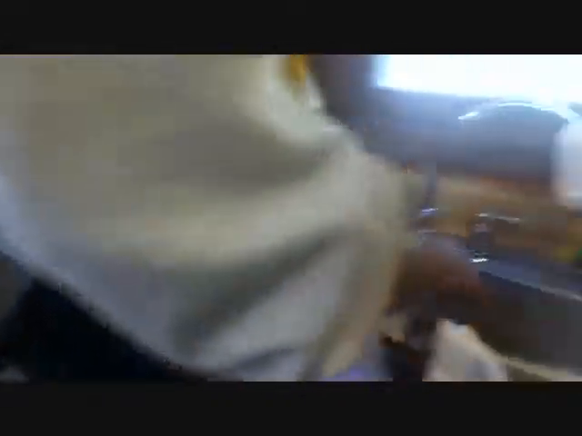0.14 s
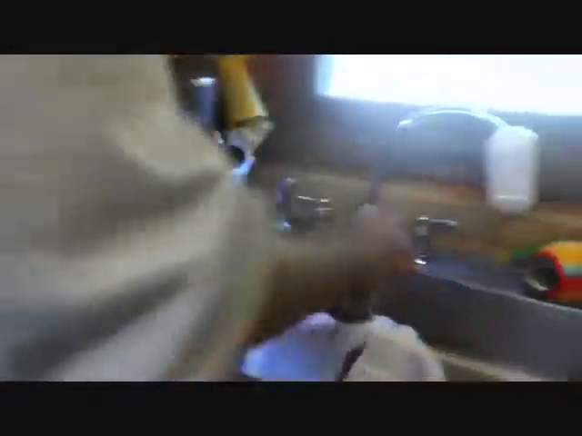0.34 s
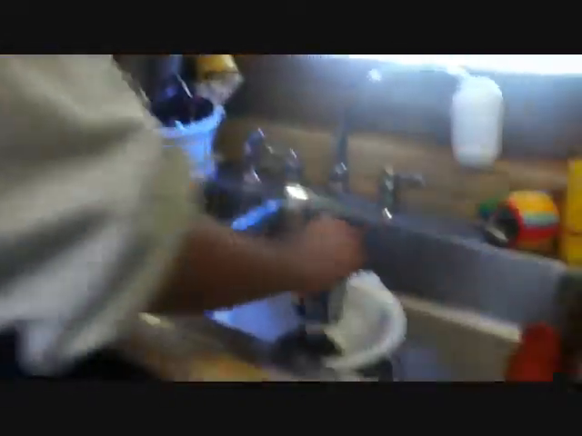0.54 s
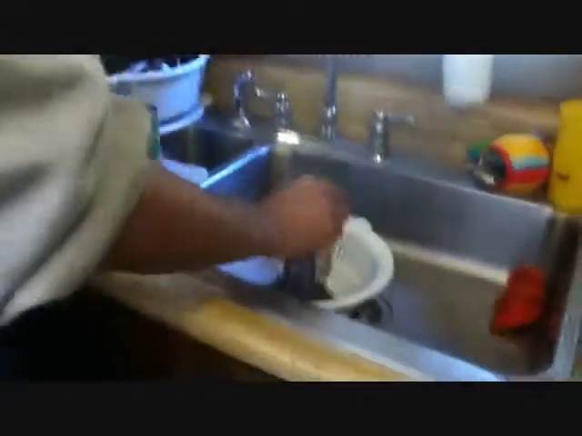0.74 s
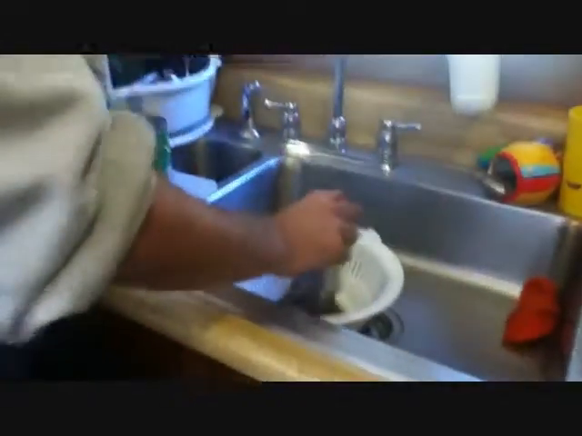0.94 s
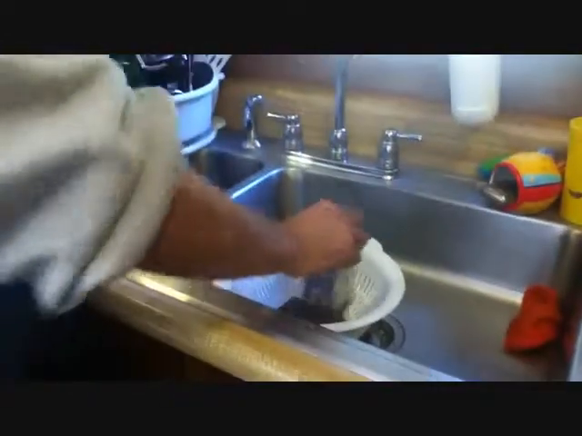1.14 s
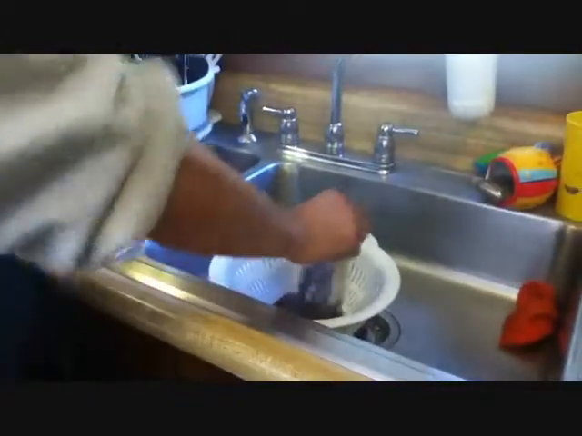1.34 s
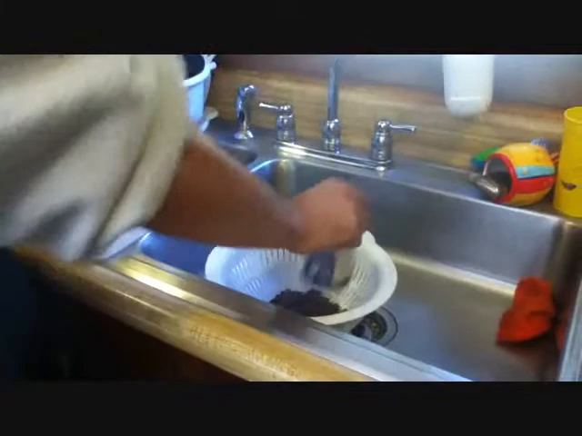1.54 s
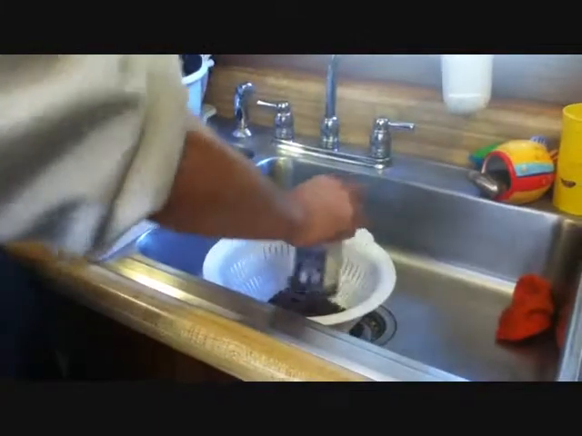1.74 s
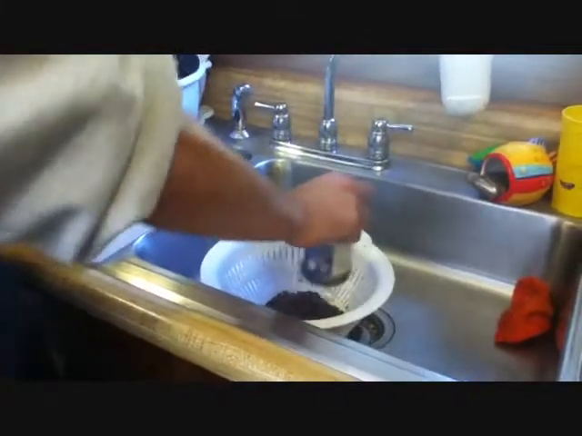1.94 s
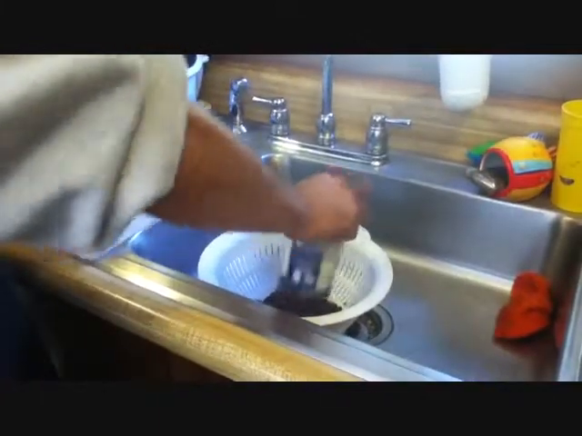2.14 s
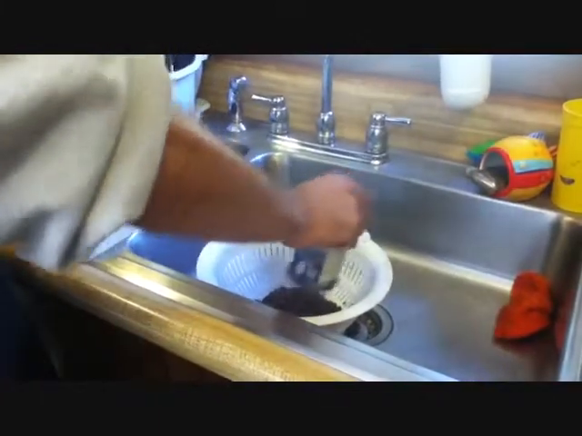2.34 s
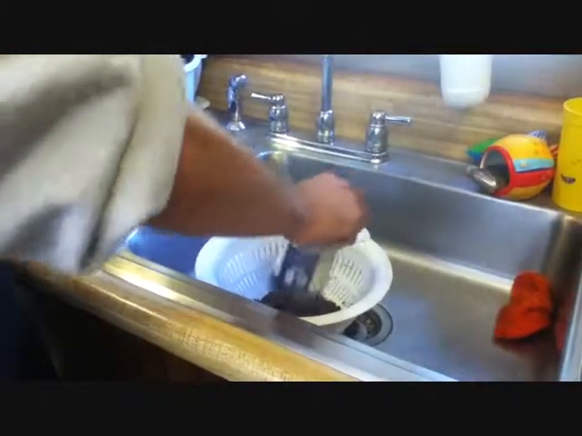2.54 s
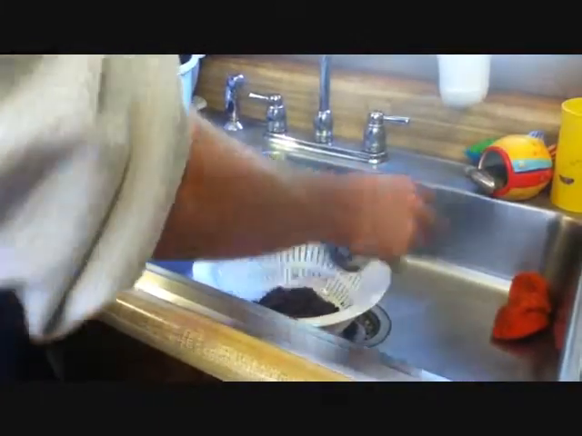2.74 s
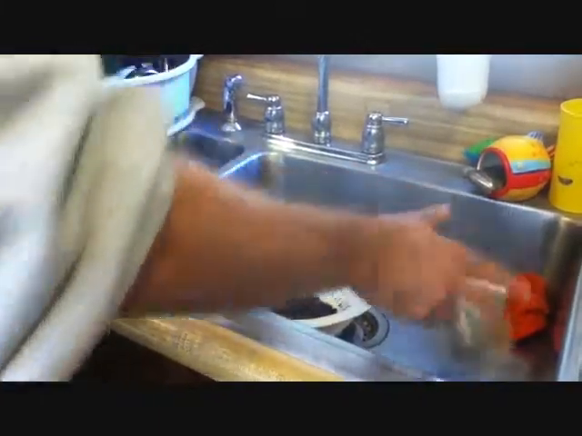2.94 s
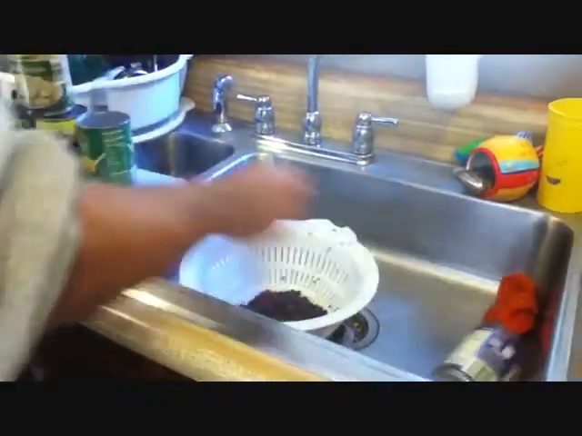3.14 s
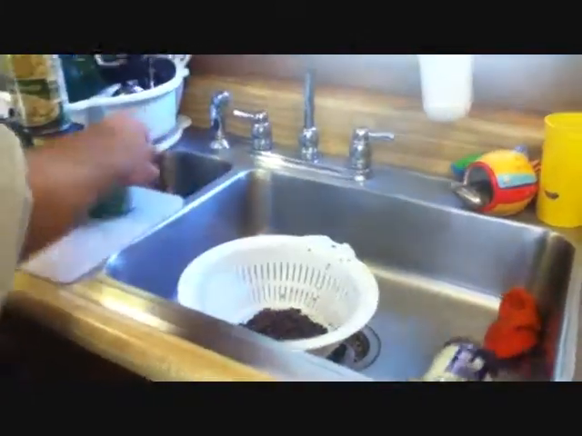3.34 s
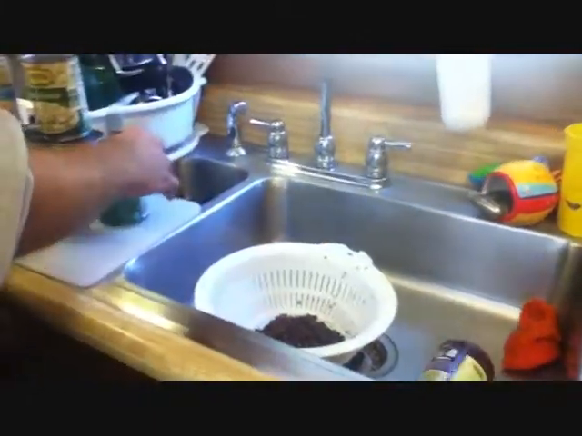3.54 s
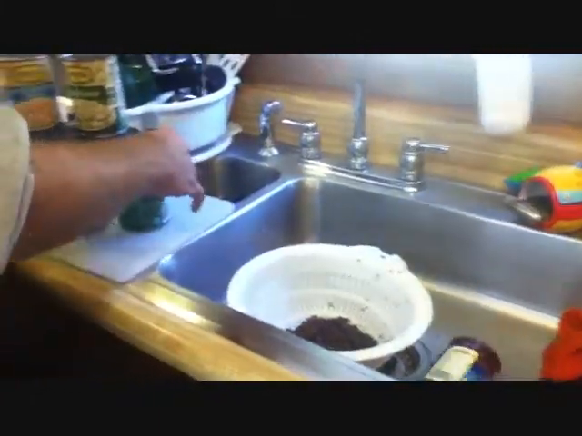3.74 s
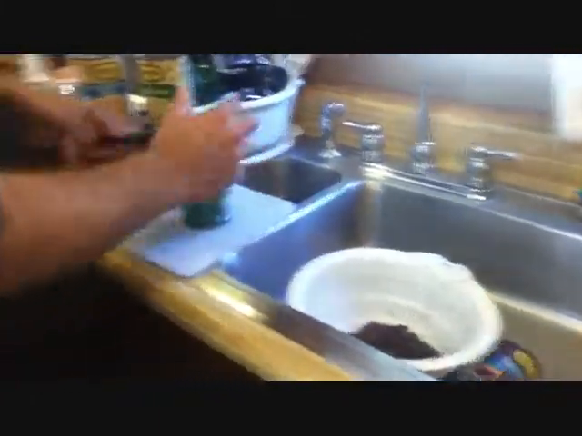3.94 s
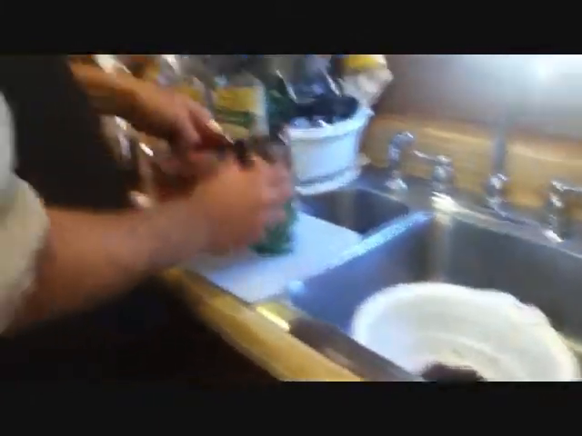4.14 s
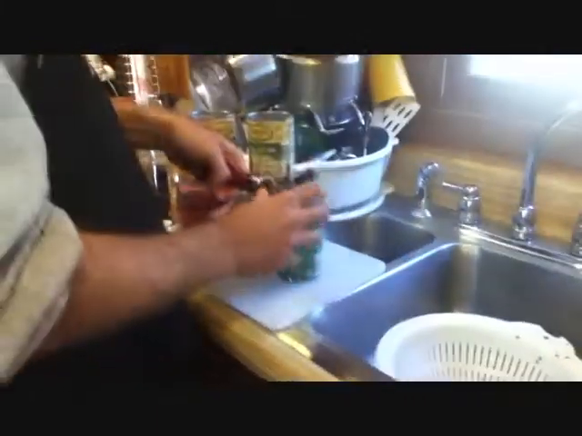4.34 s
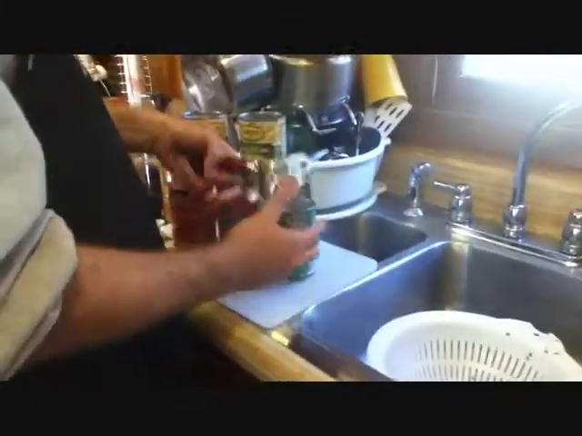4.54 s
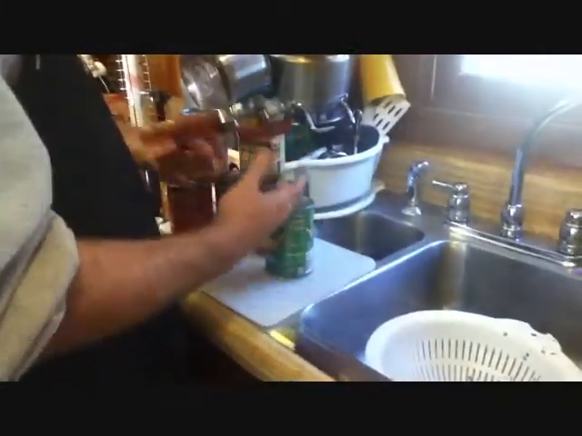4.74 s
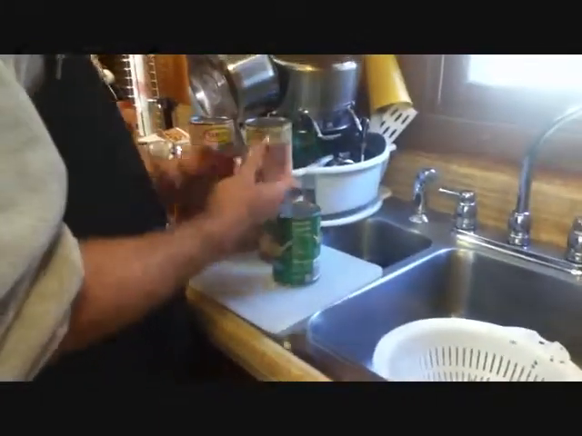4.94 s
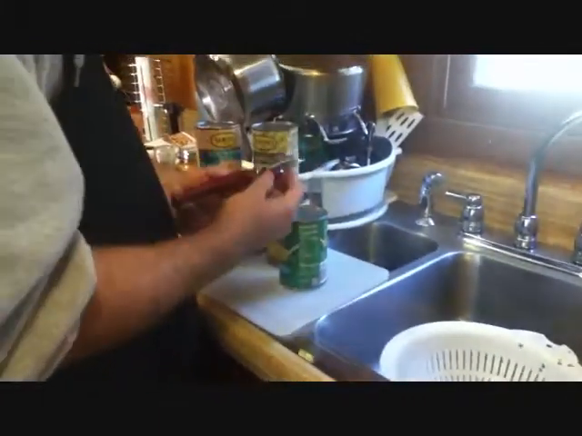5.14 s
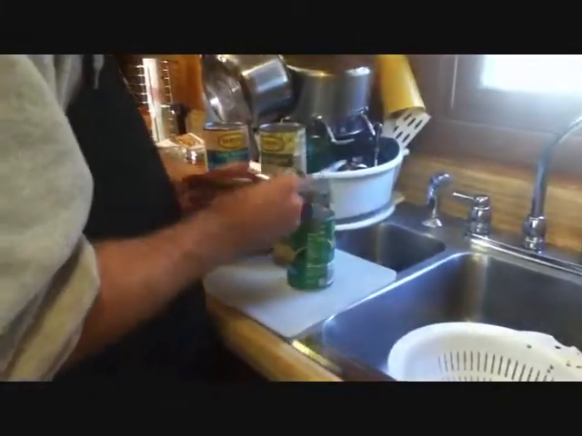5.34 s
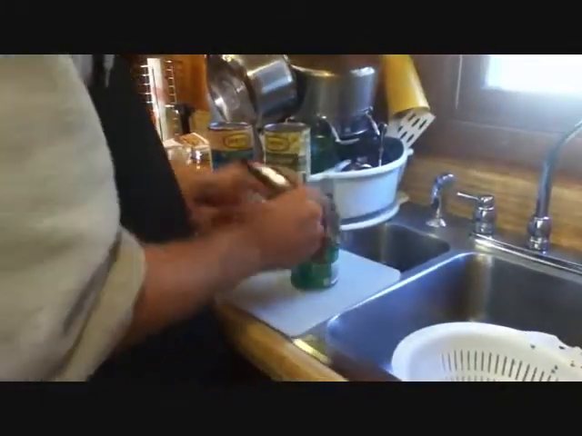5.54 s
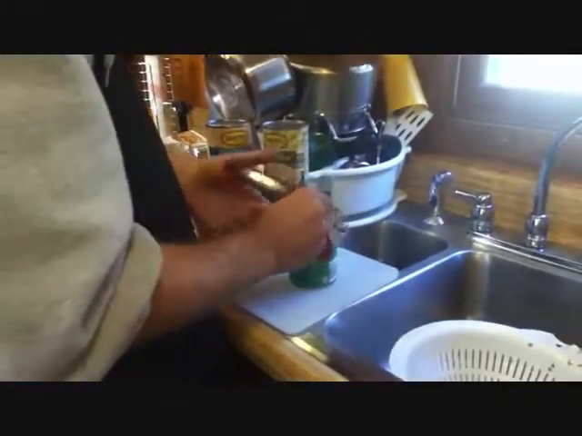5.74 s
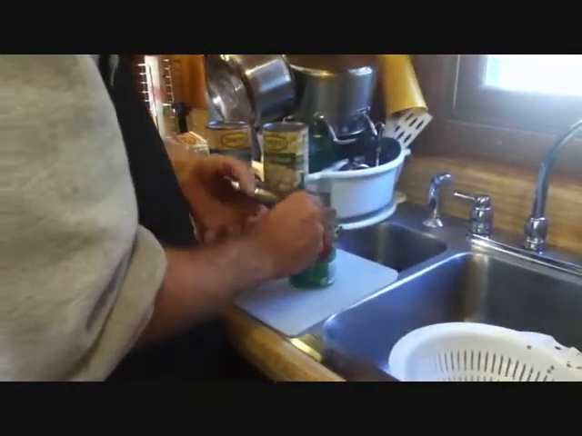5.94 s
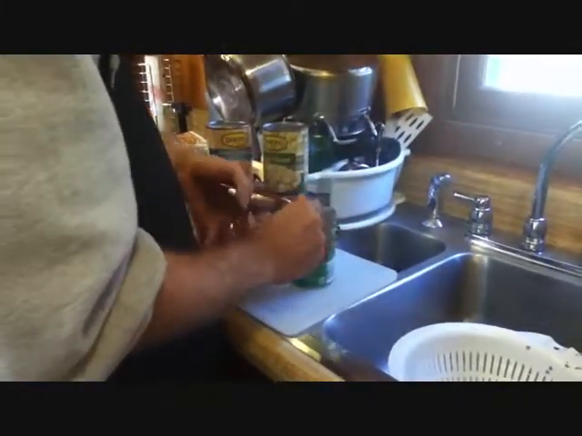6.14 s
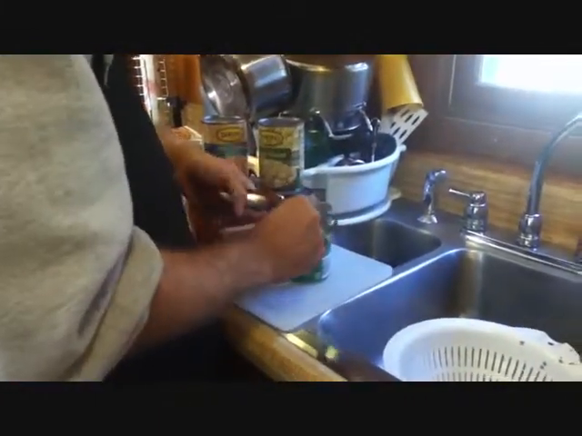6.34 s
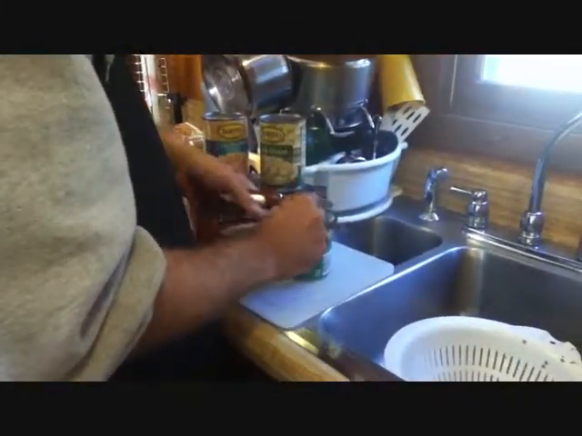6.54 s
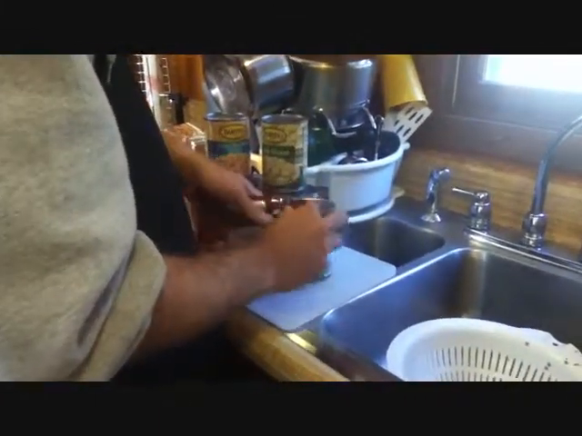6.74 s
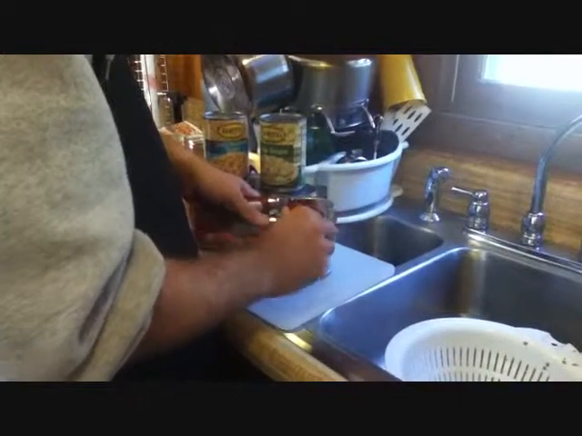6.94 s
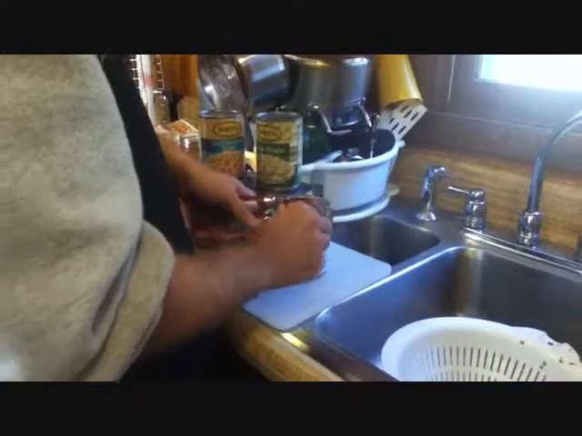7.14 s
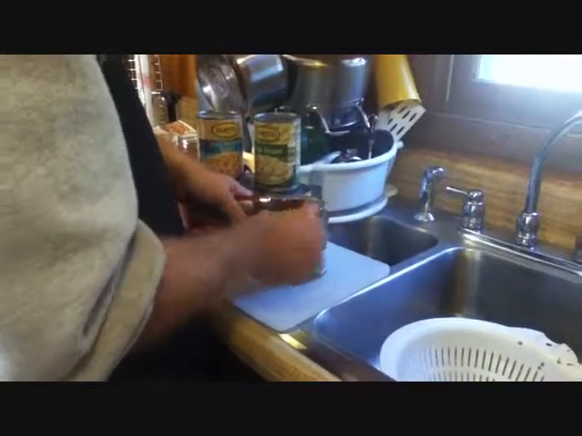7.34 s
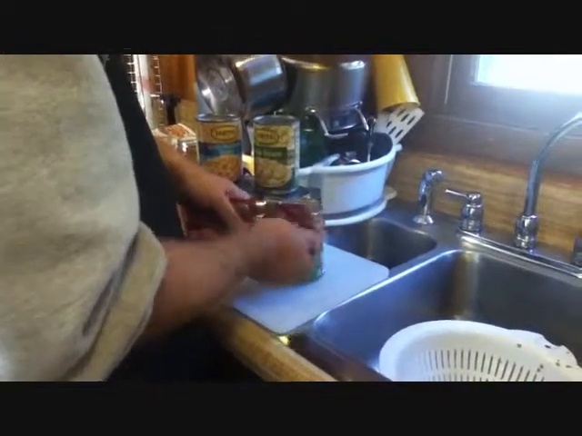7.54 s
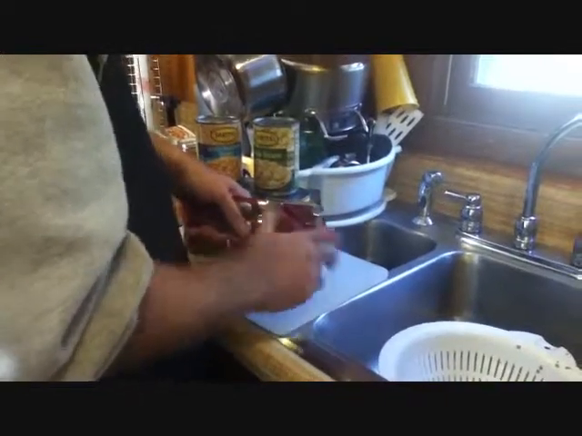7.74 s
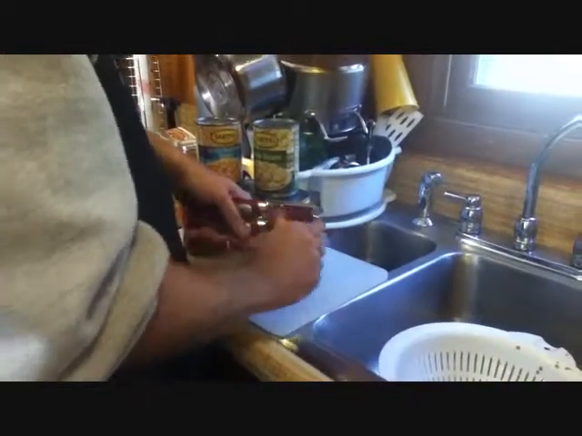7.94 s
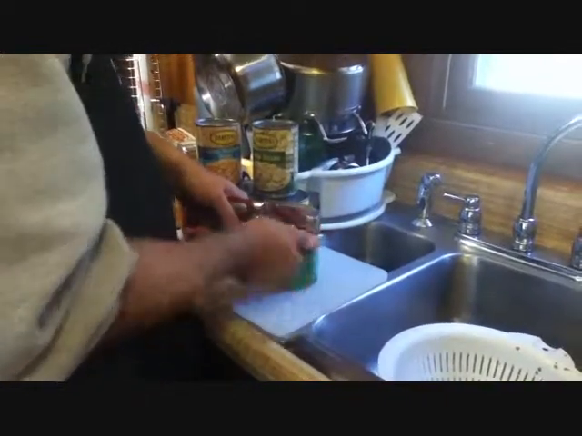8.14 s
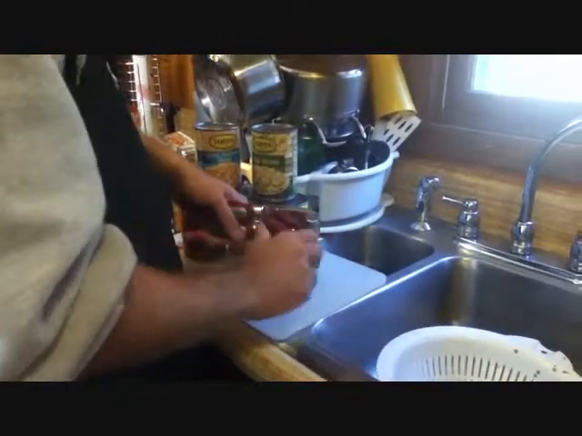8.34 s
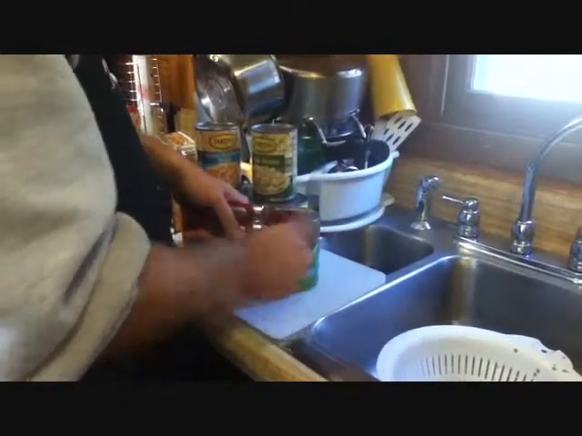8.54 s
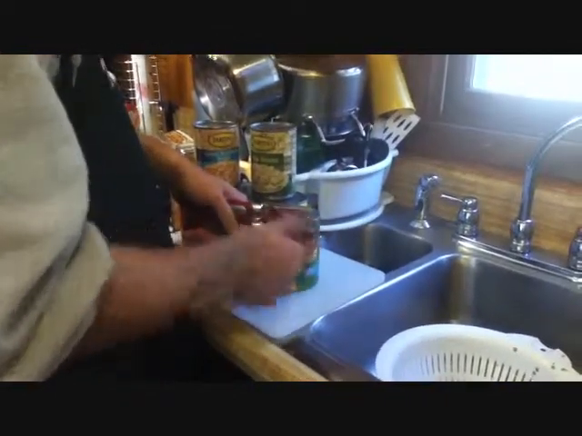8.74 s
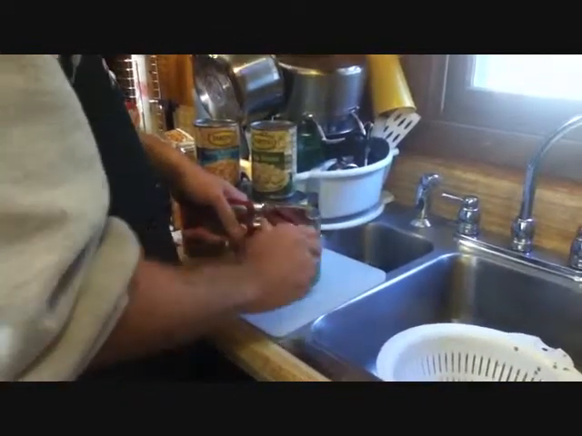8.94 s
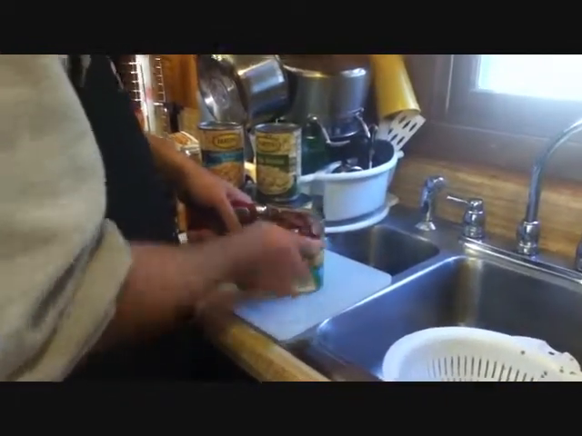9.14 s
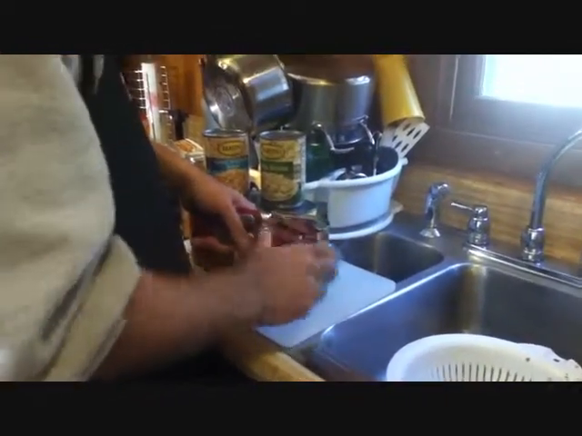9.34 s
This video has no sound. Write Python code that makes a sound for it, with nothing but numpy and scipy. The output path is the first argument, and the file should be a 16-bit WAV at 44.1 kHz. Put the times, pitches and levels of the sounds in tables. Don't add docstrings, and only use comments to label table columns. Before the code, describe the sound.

A small close microphone in a kitchen with short echo and faint, noise-suppressed hiss. At 0 s a metal scrape and drip murmur, with a sharp tap near 0.05 and a brighter knock at 0.4; small ticks and drips thin out until about 2. Near silence, then at 3.17 the empty can crashes into the steel sink, bouncing at 3.33 with bright rattle and a short ring. From 3.6 to 3.8 a can knocks and drags on a board. Quiet follows, with a tiny tap at 4.2 and faint rubs and clicks from 5. A crisp clack at 6.13, a very hard snap at 7.12 and another at 7.39 clamp the opener. Gritty, groaning cranks come around 7.5, 8.15, 8.7 and 9.2, each brief, with dull can thuds and wavering lid squeals near 1.1 kHz; the last stroke ends around 9.4.

```python
import sys
import numpy as np
from scipy import signal
from scipy.fft import rfft, irfft, next_fast_len
from scipy.io import wavfile
from scipy.ndimage import uniform_filter1d, minimum_filter1d

SR = 44100
rng = np.random.default_rng(int(sys.argv[2]) if len(sys.argv) > 2 else 0)


def generate_wav(sig):
    pcm = np.round(np.clip(np.atleast_2d(sig).T, -1, 1) * 32767).astype(np.int16)
    wavfile.write(sys.argv[1], SR, pcm)


def gain_from_db(level_db):
    decades = np.asarray(level_db, float) / 20
    return 10 ** decades


N = 413658

# time in seconds, rumble in dB, drip murmur in dB, hiss in dB.
BACKGROUND = [(0.0, -46, -30, -45), (0.23, -52, -50.5, -64), (0.78, -56, -54, -56), (3.19, -63, -59, -54),
              (3.34, -40, -41, -54), (3.45, -55, -43.5, -64), (4.39, -63, -61.5, -57),
              (7.05, -58.5, -60.5, -53.5), (7.47, -55, -45, -58.5), (7.68, -60.5, -60.5, -55.5),
              (9.2, -56.5, -61, -54.5), (9.38, -32, -58, -46)]
# pitch in Hz, level in dB per Hz.
HUSH = [(15, -58), (25, -31), (82, -2.5), (137, -2), (223, -6), (263, -15.5), (293, -6.5), (394, -14),
        (560, -16.5), (607, -19.5), (1070, -20.5), (2280, -25), (5280, -14.5), (7110, -22), (16000, -28)]
HISS_BAND_HZ = [4500, 5900]
# pitch in Hz, time to fade by 60 dB in seconds.
KITCHEN = [(100, 0.39), (400, 0.44), (1500, 0.32), (5000, 0.29), (13000, .2)]
# start in seconds, length in seconds, pitch in Hz, width in Hz, level in dB.
RUBS = [(5.033, 0.37, 3370, 500, -59.5), (5.249, 0.061, 7000, 4400, -55), (7.679, 0.047, 3370, 500, -57),
        (5.7, .06, 3900, 150, -58), (7.879, 0.05, 3400, 800, -59), (7.921, .11, 4850, 140, -63.5),
        (8.007, .045, 3180, 700, -56), (8.411, 0.068, 3400, 1200, -58.5), (4.202, .018, 6100, 2800, -38),
        (3.4, 0.027, 6100, 2800, -39.5)]
# start in seconds, edge (2-6 kHz) in dB, thump in dB, body in dB, top in dB,
# time to fade by 60 dB in seconds.
SINK_BLOWS = [(0.0534, -28, -33, -37, -28.5, 0.3), (0.3037, -56, -39, -57, -44, 0.13),
              (0.4038, -15, -34, -48, -24, 0.11), (0.4174, -31, -26, -29, -30, 0.04),
              (0.4394, -75, -41, -32, -51, 0.098), (0.477, -40, -46, -69, -39.5, 0.17),
              (0.5184, -42, -46, -63, -36, 0.12), (0.5582, -43, -49, -56, -48, 0.08),
              (0.599, -59, -45, -69, -35.5, 0.12), (0.6554, -46, -44, -47, -73, 0.069),
              (0.7396, -53, -44, -56, -65, 0.068), (0.8494, -64, -36.5, -60, -73, 0.11),
              (0.8784, -37, -56, -41, -73, 0.052), (0.9222, -44, -41, -59, -50, 0.088),
              (0.9594, -61, -64, -44, -67, 0.089), (1.076, -38, -77, -36, -78, 0.092),
              (1.131, -37.5, -67, -60, -44.5, 0.079), (1.2538, -60, -74, -44, -43, 0.1),
              (1.5435, -57, -54, -49.5, -64, 0.13), (1.6844, -49, -45, -44.5, -56, 0.099),
              (1.7084, -46, -51, -42, -51, 0.068), (1.8602, -46, -41, -67, -35.5, 0.059),
              (2.0594, -58, -54, -55, -66, 0.051), (3.01, -60, -75, -68, -44, 0.17),
              (3.1714, -2, -12, -13, -8, 0.12), (3.1855, -16, -21, -9, -40, 0.068),
              (3.2394, -27, -31, -33, -53, 0.24), (3.3276, -5.5, -15.5, -23.5, -16.5, 0.1),
              (3.3344, -37, -39, -16.5, -26, 0.14), (3.3888, -22.5, -24, -37.5, -28, 0.2)]
BOARD_BLOWS = [(3.6466, -37, -45, -42, -42, 0.08), (3.676, -28, -48, -33.5, -49, 0.12),
               (3.7183, -33, -31.5, -45, -33.5, 0.11), (3.7825, -30, -30.5, -56, -38, 0.035),
               (4.1914, -46, -49, -58.5, -53, 0.089), (4.2055, -44.5, -42.5, -48, -38, 0.087),
               (5.025, -41.5, -56, -67, -48, 0.08), (5.1253, -34, -67, -73, -38, 0.069),
               (5.478, -28.5, -56, -63.5, -39.5, 0.11), (5.727, -43, -65, -67.5, -52, 0.062),
               (6.0527, -25.5, -32, -37.5, -39.5, 0.092), (6.134, -14, -23, -27.5, -13.5, 0.077),
               (6.3316, -40.5, -41.5, -47.5, -56, 0.085), (6.54, -46.5, -51, -41, -58, 0.067),
               (6.6945, -44.5, -34, -48, -65, 0.082), (6.8882, -41.5, -59.5, -80, -56, 0.16),
               (7.1185, -2.5, -24.5, -10, -14.5, 0.062), (7.1254, -37, -30.5, -10, -38, 0.055),
               (7.3876, -13.5, -18, -28, -18.5, 0.09), (7.5237, -33, -35, -40, -48, 0.093),
               (8.2639, -26.5, -28, -51, -36, 0.064), (8.6488, -39, -34, -43.5, -46, 0.11),
               (8.7104, -19.5, -26.5, -39, -37, 0.19), (8.7374, -18.5, -42, -31, -35, 0.11),
               (9.1981, -27, -28, -32, -57, 0.093), (9.2803, -23.5, -26.5, -29.5, -29.5, 0.07)]
BLOW_HZ = [250, 900, 3500, 10000]
# pitch in Hz, level above the blow's colour in dB, 60 dB fade in seconds.
SINK_MODES = [(165, -6.5, 0.25), (250, -5.5, .3), (346.7, -1.5, 0.1), (463, -3, 0.47), (601, -7, 0.33),
              (658, 2.5, 0.15), (789, -3, 0.36), (986, 0, 0.24), (1200, -8, 0.17), (1300, -12, 0.076),
              (1420, 9, 0.15), (1830, -8.5, .1)]
CAN_MODES = [(243, 3, 0.18), (318.2, -4, 0.34), (447, -12, .2), (834, 2, 0.099), (1072, -1.5, 0.24),
             (1200, -23, 0.11), (1825, 1, 0.099), (2130, -12, 0.033), (2330, -29.5, 0.092),
             (3300, -21, 0.029)]
# start in seconds, peak in dB.
SNAPS = [(0.0564, -17), (1.1325, -38), (1.8645, -44), (3.172, -1), (3.3288, 1.5), (4.2045, -29),
         (5.1267, -27), (5.4803, -17.5), (5.7296, -32.5), (6.0542, -29), (6.135, -6), (7.12, -4),
         (7.387, -6.5)]
# start in seconds, pitch in Hz, level in dB, 60 dB fade in seconds,
# rise in seconds.
NOTES = [(.056, 8400, -31, 0.12, .002), (.056, 5050, -31, 0.1, 0.0018), (.056, 3700, -41, .3, .002),
         (0.021, 2930, -42, 0.49, .004), (3.199, 165, -15.5, 0.24, 0.011), (3.233, 463, -15.5, 0.24, .006),
         (3.719, 310, -20, .2, 0.028), (6.135, 5650, -31, 0.11, .001), (6.135, 834, -24.5, 0.12, 0.0023),
         (0.421, 340, -37.5, 0.7, .01), (.42, 753, -29, 0.1, .005), (0.559, 1490, -36.5, 0.04, .003),
         (.67, 830, -37, 0.061, .005), (0.961, 1300, -42, 0.051, .003), (1.081, 1050, -34, 0.077, .004),
         (1.2, 703, -48.5, 0.56, .02), (2.128, 987, -43.5, 0.13, .005), (3.4, 462, -28, 0.59, .03),
         (3.645, 792, -23.5, 0.23, .02), (3.63, 245, -23.5, 0.41, .03), (3.678, 2080, -23, 0.025, .002),
         (5.125, 1860, -43.5, 0.045, .002), (6.055, 1910, -31, 0.081, 0.0018),
         (6.334, 1890, -51, .06, .002), (6.54, 454, -40, 0.16, .004), (6.72, 99, -48, 0.43, .04),
         (7.124, 1830, -24.5, 0.076, .003), (7.125, 447, -25, 0.49, .006), (7.12, 817, -7.5, 0.062, .002),
         (8.21, 2050, -26, 0.1, .015), (8.245, 3700, -30, 0.092, .01)]
THUDS = [(6.819, 239, -36.5, .1, 0.0028), (7.82, 230, -36.5, 0.11, .004), (7.389, 243, -15.5, 0.13, 0.0018),
         (8.272, 250, -15.5, 0.067, 0.00093), (8.285, 250, -11, 0.022, 0.00068),
         (8.301, 259, -28, 0.044, .002), (8.332, 356, -19, 0.04, 0.0017), (8.349, 290, -27.5, .06, 0.0024),
         (8.383, 335, -33.5, 0.071, 0.0035), (8.398, 343, -33.5, 0.039, .002), (8.838, 250, -30, 0.1, .004),
         (9.294, 250, -25.5, .05, .001), (9.303, 250, -13.5, 0.086, .002)]
# time in seconds, pitch in Hz, level in dB.
SQUEALS = [
    [(7.62, 1080, -53), (7.658, 1073, -45.5), (7.7, 1070, -66)],
    [(8.1, 1130, -51), (8.156, 1100, -33.5), (8.26, 1051, -43)],
    [(8.735, 1191, -30), (8.895, 1216, -67), (8.91, 1200, -64)],
    [(9.145, 1115, -45.5), (9.191, 1126, -33), (9.29, 1073, -43)],
]
# time in seconds, board groan in dB, can wall in dB, cutter grit in dB.
STROKES = [
    [(0.0, -32, -31, -41), (0.048, -41, -35, -51), (0.054, -32.5, -32, -33), (0.37, -49, -62, -65),
     (0.39, -53, -68, -62)],
    [(3.62, -49, -60, -71), (3.654, -36, -37.5, -43), (3.728, -40, -38, -42), (3.762, -37, -45, -52),
     (4.0, -56, -64, -76)],
    [(7.49, -44, -45, -46), (7.532, -34.5, -39.5, -50), (7.71, -49.5, -51, -55), (7.76, -56.5, -71, -75)],
    [(8.09, -64, -58, -62), (8.158, -32, -29.5, -40.5), (8.264, -31, -33, -40.5), (8.28, -30.5, -62, -61.5),
     (8.48, -57.5, -74.5, -54)],
    [(8.62, -64, -69, -61), (8.652, -42.5, -38, -49), (8.748, -26.5, -30.5, -38), (8.92, -57, -65, -68)],
    [(9.13, -81, -67.5, -67.5), (9.17, -38, -32, -43), (9.304, -25.5, -39, -42.5), (9.38, -45, -61, -72)],
]
# pitch in Hz, width in Hz, level in dB.
GROAN = [(242.3, 16, -3), (310, 45, -6.5), (447, 40, -5)]
# pitch in Hz, width in Hz, level in dB.
WALL = [(754, 130, -1.5), (1050, 63, -2.5), (1130, 120, -1.5), (1460, 150, -10.5), (1746, 120, -8),
        (2178, 74, -6.5), (2416, 90, -9)]
# pitch in Hz, width in Hz, level in dB.
GRIT = [(2740, 130, -17.5), (3700, 390, -0.5), (4870, 2900, -1), (6300, 900, -0.5), (8000, 1700, -4.5),
        (11000, 2720, -18)]
EDGES_HZ = 25 * 2 ** np.arange(0, 9.5, 1 / 3)


def rms_one(x):
    return x / np.sqrt(np.mean(x ** 2) + 1e-20)


def in_time(rows, outside=None):
    s, *columns = np.transpose(rows)
    return [np.interp(np.arange(N) / SR, s, c, outside, outside) for c in columns]


def at_hz(xs, ys, hz):
    return np.interp(np.log(hz), np.log(xs), ys)


def bandpass(x, low_hz, high_hz, order=2):
    return signal.sosfilt(signal.butter(order, [low_hz, high_hz], "band", fs=SR, output="sos"), x)


def bands():
    white = rng.standard_normal((2, N))
    for k, (low, high) in enumerate(zip(EDGES_HZ, EDGES_HZ[1:])):
        yield np.sqrt(low * high), bandpass(white[k % 2], low, high)


def wobble(rate_hz, count):
    knots = rng.standard_normal((count, 1200))
    return [np.interp(np.arange(N) / SR * rate_hz, np.arange(1200), k) for k in knots]


def fade(t, t60):
    return np.exp(-np.log(1000) * t / t60)


def ring(clicks, hz, t60):
    r = gain_from_db(-60 / (max(t60, 1 / 2000) * SR))
    w = 2 * np.pi * hz / SR
    return signal.lfilter([0, np.sin(w)], [1, -2 * r * np.cos(w), r * r], clicks + 1e-18)


def resonate(x, peaks, patchy_db):
    out = 0
    feeds = wobble(60, count=len(peaks))
    for k, ((hz, width_hz, level_db), own) in enumerate(zip(peaks, feeds)):
        r = np.exp(-np.pi * width_hz / SR)
        fed = x * gain_from_db(patchy_db * own)
        rung = signal.lfilter([1, 0, -1], [1, -2 * r * np.cos(2 * np.pi * hz / SR), r * r], fed)
        out = out + (-1) ** k * gain_from_db(level_db) * rms_one(rung)
    return rms_one(out)


def colour_db(blow, hz):
    s, edge_db, thump_db, body_db, top_db, t60 = blow
    levels_db = [thump_db - 11, thump_db, body_db, edge_db - 7.5, top_db, top_db - 24]
    return at_hz([80] + BLOW_HZ + [16000], levels_db, hz)


def rattle_envelope(hz):
    t = np.arange(SR // 2) / SR
    envelope = np.zeros(N + len(t))
    rise = 1 - np.exp(-t * min(hz * 0.44, 900))
    for blow in SINK_BLOWS + BOARD_BLOWS:
        at = round(blow[0] * SR)
        t60 = max(blow[5], .01) * (hz / 2000) ** -.25
        dying = t[:round(t60 * SR)]
        envelope[at:at + len(dying)] += gain_from_db(colour_db(blow, hz)) * rise[:len(dying)] * fade(dying, t60)
    return envelope[:N]


def background_and_rattle():
    rumble_db, murmur_db, hiss_db = in_time(BACKGROUND)
    air, rattle = np.zeros(N), np.zeros(N)
    patches_db = 2.0 * np.array(wobble(14, count=4))
    for hz, noise in bands():
        octaves_off = abs(np.log2(hz / np.array([170, 900, 5000])))
        share = np.clip(1 - octaves_off / 2.61, 0, 1) + [hz < 170, 0, hz > 5000]
        share = share / share.sum()
        swell_db = share[0] * (rumble_db + 67) + share[1] * (murmur_db + 72.5) + share[2] * (hiss_db + 63)
        uneven_db = patches_db[round(hz) % 4] * (hz < 1400)
        air += gain_from_db(at_hz(*np.transpose(HUSH), hz) + swell_db - 43.5 + uneven_db) * noise
        rattle += rattle_envelope(hz) * rms_one(noise)
    hump = bandpass(rng.standard_normal(N), *HISS_BAND_HZ, order=1)
    air += gain_from_db(hiss_db - 8.5) * rms_one(hump)
    return air, gain_from_db(-7) * rattle


def kitchen(x):
    size = next_fast_len(N + SR)
    hz = np.arange(size // 2 + 1) * SR / size + 1e-3
    t60 = at_hz(*np.transpose(KITCHEN), hz)
    loops = 0
    for k, lag in enumerate(rng.uniform(.011, .037, 10)):
        turn = gain_from_db(-60 * lag / np.maximum(t60, .05)) * np.exp(-2j * np.pi * hz * lag)
        loops = loops + (-1) ** k * turn / (1 - turn)
    return irfft(rfft(x, size) * loops, size)[:N]


def rubs():
    out = np.zeros(N)
    noises = rng.standard_normal((len(RUBS), SR // 2))
    for (s, length, hz, width_hz, level_db), noise in zip(RUBS, noises):
        band = bandpass(noise, hz - width_hz / 2, hz + width_hz / 2)
        swell = np.sqrt(np.hanning(round(length * SR)))
        out[round(s * SR):][:len(swell)] += gain_from_db(level_db) * swell * rms_one(band)[:len(swell)]
    return out


def struck(blows, modes, level_db):
    out = np.zeros(N + SR)
    chance = rng.standard_normal((len(blows), len(modes)))
    hz, mode_db, t60 = np.transpose(modes)[:, :, None]
    for blow, own in zip(blows, chance):
        damped = t60 * max(blow[5], .01) / 0.11
        t = np.arange(round(min(damped.max(), .5) * SR)) / SR
        gain = gain_from_db(colour_db(blow, hz) + mode_db + level_db + 2.5 * own[:, None])
        tones = gain * fade(t, damped) * np.sin(2 * np.pi * hz * t)
        out[round(blow[0] * SR):][:len(t)] += tones.sum(axis=0)
    return out[:N]


def snaps():
    clicks = np.zeros(N)
    clicks[[round(s * SR) for s, peak_db in SNAPS]] = gain_from_db(np.array(SNAPS)[:, 1] + 1.5)
    return ring(clicks, 5000, 1 / 1000) + gain_from_db(-10.5) * np.diff(clicks, prepend=0)


def notes_and_thuds():
    out, t = np.zeros(N + SR), np.arange(SR // 2) / SR
    for s, hz, level_db, t60, rise in NOTES + THUDS:
        shape = (1 - np.exp(-t / max(rise, .0005))) * fade(t, t60)
        pair = np.sin(2 * np.pi * hz * t) + 0.24 * np.sin(2 * np.pi * (hz + 40) * t)
        out[round(s * SR):][:len(t)] += gain_from_db(level_db) * shape * pair
    return out[:N]


def lid_squeal():
    out = np.zeros(N)
    slow = signal.butter(2, 70, fs=SR, output="sos")
    flutter = rms_one(signal.sosfilt(slow, rng.standard_normal((2, N))))
    for rows in SQUEALS:
        phase = 2 * np.pi * np.cumsum(in_time(rows)[0]) / SR
        level = gain_from_db(in_time(rows, outside=-120)[1] - 2.0)
        out += level * ((1 + .7 * flutter[0]) * np.sin(phase) + .4 * flutter[1] * np.cos(phase))
    return out


def cranking():
    hits = rng.random(N) < 1200 / SR
    strength = gain_from_db(2.3 * np.minimum(rng.exponential(1, N), 3))
    slips = rms_one(hits * strength * rng.choice([-1, 1], N)) + 0.58 * rng.standard_normal(N)
    groan = resonate(slips, GROAN, patchy_db=5.5)
    wall = resonate(slips, WALL, patchy_db=3.0)
    grit = resonate(slips, GRIT, patchy_db=2.5)
    layers = np.array([groan, wall, grit])
    out = np.zeros(N)
    for stroke in STROKES:
        span = slice(round(stroke[0][0] * SR), round(stroke[-1][0] * SR))
        levels = gain_from_db(np.array(in_time(stroke))[:, span] - 5.0)
        out[span] += (levels * layers[:, span]).sum(axis=0)
    return out


def scene():
    air, near = background_and_rattle()
    near += struck(SINK_BLOWS, SINK_MODES, level_db=-9.5)
    near += struck(BOARD_BLOWS, CAN_MODES, level_db=-4.5)
    near += snaps() + rubs() + notes_and_thuds()
    near += cranking() + lid_squeal()
    near = signal.sosfilt(signal.butter(4, 150, "high", fs=SR, output="sos"), near)
    return (near + gain_from_db(-19) * kitchen(near) + air)[None]


def band_limit(x):
    return signal.sosfilt(signal.butter(12, 16460, fs=SR, output="sos"), x)


def record(dry):
    power_db = 10 * np.log10(uniform_filter1d(dry[0] ** 2, size=132) + 1e-12)
    ahead, block = round(.012 * SR), round(.004 * SR)
    coming_db = -minimum_filter1d(-power_db, size=ahead, origin=-(ahead // 2))
    duck_db = -1.6 * np.maximum(coming_db - power_db - 28.5, 0)
    swell_in_db = -minimum_filter1d(-power_db, size=block, origin=-(block // 2)) - 29.5
    swell_in = gain_from_db(swell_in_db) * rms_one(signal.lfilter([1], [1, -.6], rng.standard_normal(N)))
    ducked = dry * gain_from_db(uniform_filter1d(duck_db, size=44))
    rounded = 1.239 * np.tanh((ducked + swell_in) / 1.153)
    mix = signal.sosfilt(signal.cheby2(10, 60, 16600, fs=SR, output="sos"), rounded)
    return band_limit(mix)


dry = scene()
out = record(dry)
generate_wav(out)
```